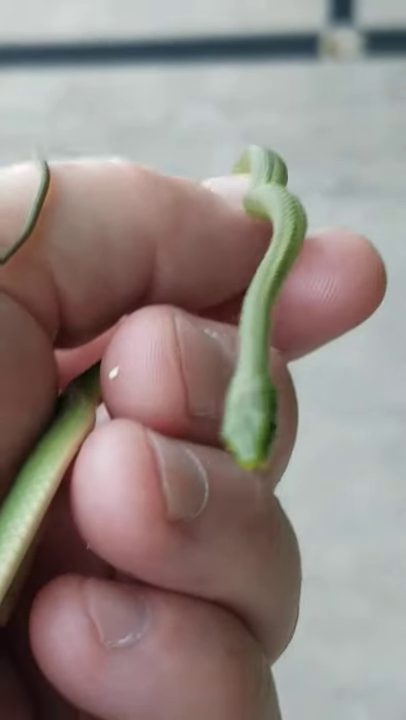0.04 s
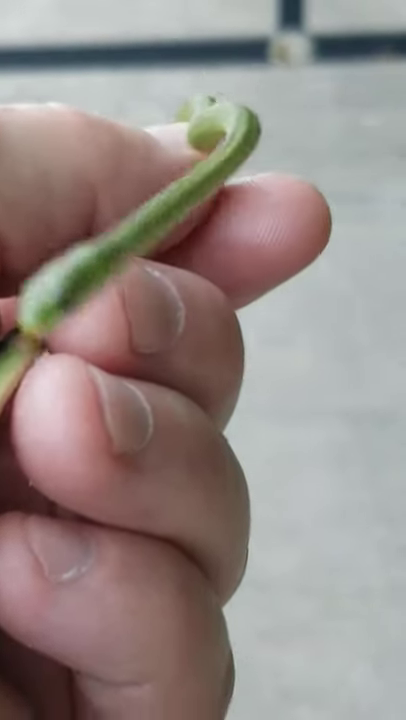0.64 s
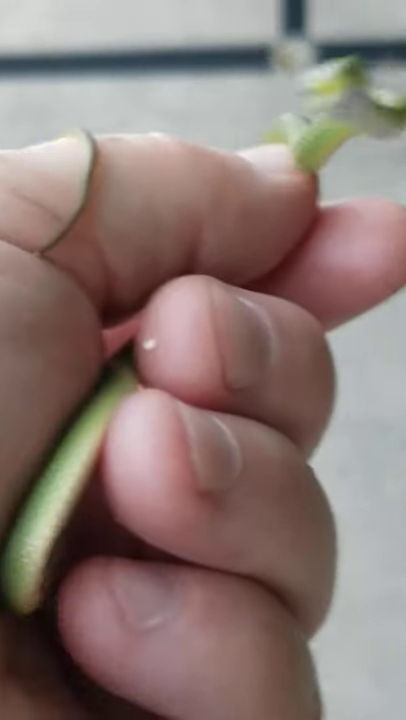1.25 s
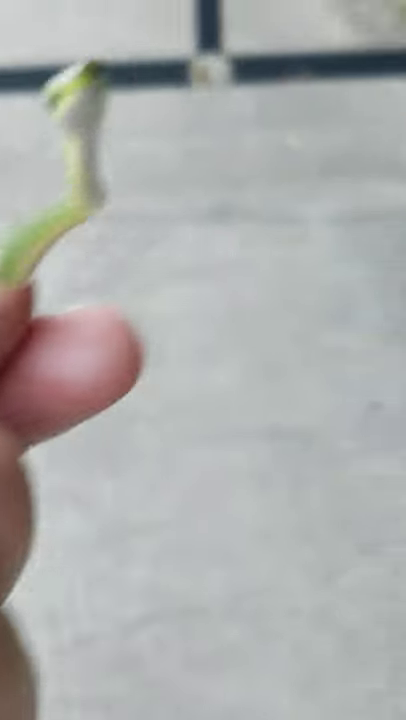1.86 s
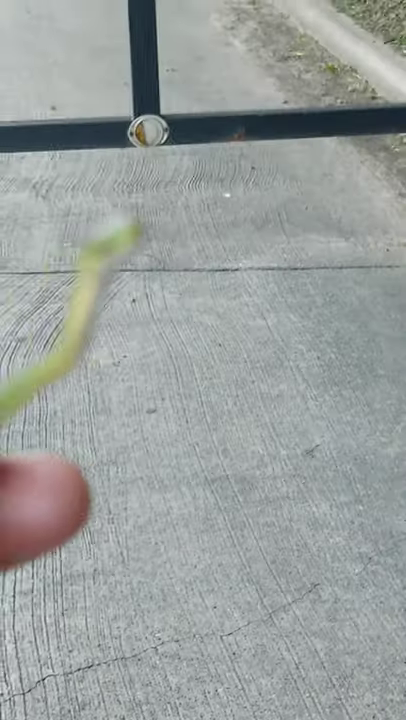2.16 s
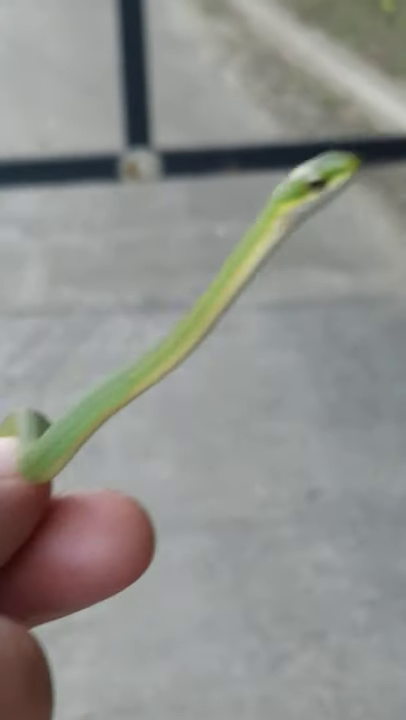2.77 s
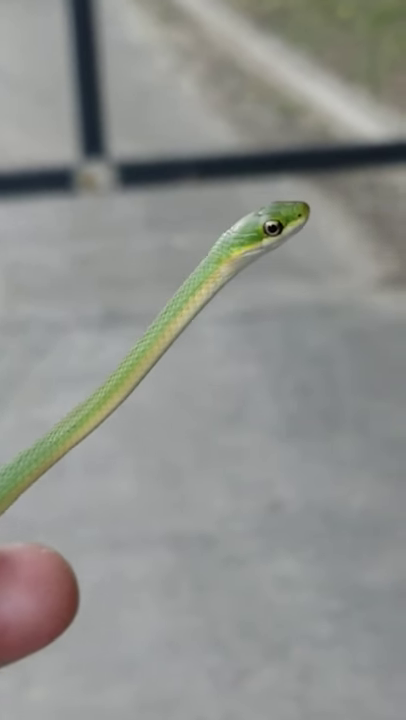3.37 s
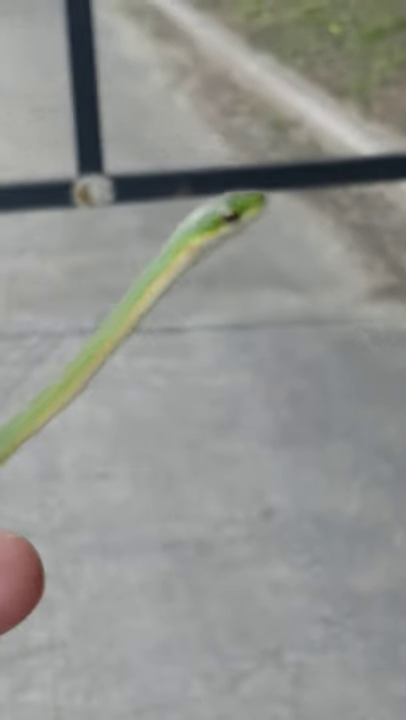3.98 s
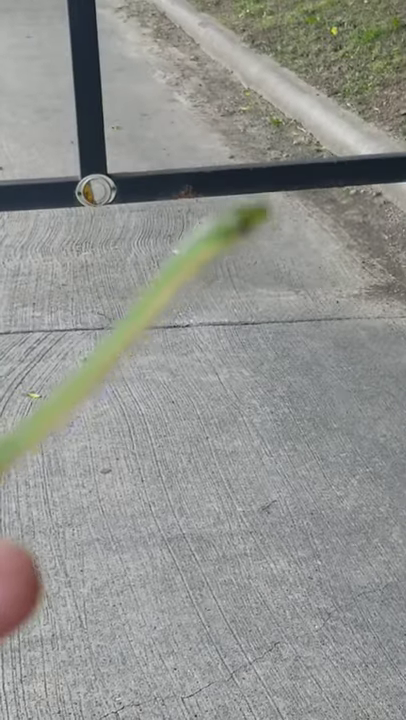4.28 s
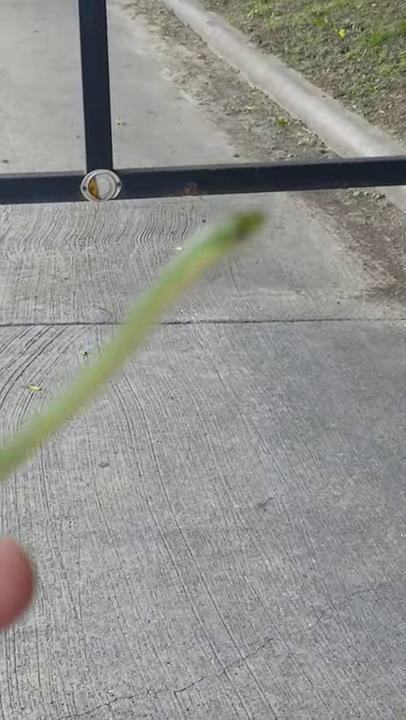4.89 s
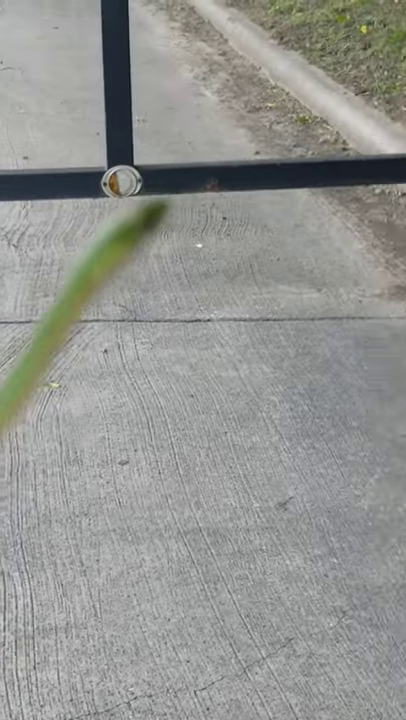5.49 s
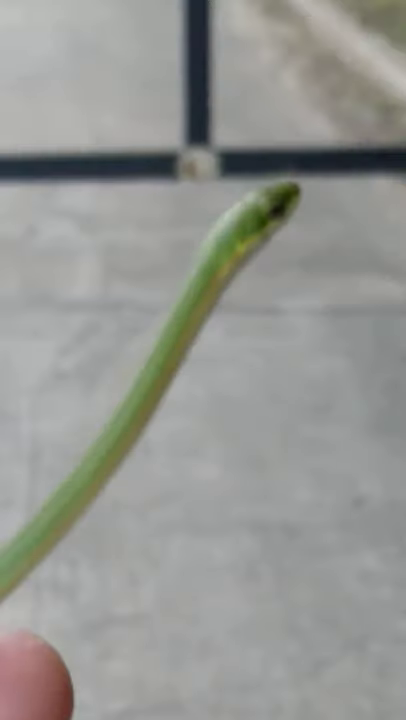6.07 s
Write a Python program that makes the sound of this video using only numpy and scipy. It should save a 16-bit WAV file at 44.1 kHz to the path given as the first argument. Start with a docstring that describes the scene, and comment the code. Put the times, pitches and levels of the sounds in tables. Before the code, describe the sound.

The sound opens quietly outdoors, with a steady hum of distant traffic and a light low wind on the microphone. At about 0.9 seconds the breeze picks up into an uneven, deep rumble, stronger on the left and dotted with soft thumps; it stays the loudest sound to the end. Behind it, the tyre noise of far cars gently swells and fades several times. A faint, high insect hiss sits on the right, slowly weakening, with a brief swell around 4.6 seconds. Very faint, raspy bird chirps come at about 0.7, 1.8 and between 3 and 4 seconds. At about 5.1 and 5.8 seconds a bird on the right gives two soft falling calls, each a rasp clearing into a whistle, the second louder. The wind thumps at about 4.8 seconds, then hardest around 5.7 and 6.1 seconds.

```python
"""Low wind rumble on a phone's two microphone ports, over the hum of far traffic and passing tyres.
Insects stridulate on the right, merging into a hiss. Single eddies thump the left port.
Birds chirp faintly; near the end one gives two falling calls, each a rasp clearing to a whistle."""
import sys
import numpy as np
from scipy import signal
from scipy.fft import rfft, irfft
from scipy.io import wavfile
from scipy.ndimage import uniform_filter1d

SR = 44100
rng = np.random.default_rng(int(sys.argv[2]) if len(sys.argv) > 2 else 0)


def to_wav(sig):
    """Store sig (one row per channel, or 1-D mono) as 16-bit WAV at the path in sys.argv[1].

    Samples outside -1..1 are clipped; the rate is SR.
    """
    pcm = np.clip(np.atleast_2d(sig), -1, 1) * 32767
    pcm = np.round(pcm).astype(np.int16)
    wavfile.write(sys.argv[1], SR, pcm.T)  # frames by channels


N = 274743
TIME_S, FREQ_HZ = np.arange(N) / SR, np.arange(N // 2 + 1) * SR / N

# breeze strength at the left port: time_s, level_db
BREEZE = [(0, -51), (.55, -55), (.82, -49.5), (.89, -33), (1.2, -32), (1.45, -36.5), (1.85, -30.5),
          (2.5, -31.5), (2.7, -35.5), (3.45, -33.5), (4.15, -37), (4.75, -39), (4.83, -29), (4.95, -39),
          (5.4, -34.5), (5.68, -27), (6.07, -34.5), (6.2, -28)]
# turbulence spectrum: freq_hz, relative_db
WIND_SPECTRUM = [(15, -22), (40, -6), (75, 1), (130, -2.5), (175, -9), (250, -28.5), (350, -35.5),
                 (600, -59), (1200, -97)]
# far traffic spectrum: freq_hz, left_db_per_hz, right_db_per_hz
FAR_TRAFFIC = [(29.8, -92, -84.5), (88, -88, -79.5), (248, -75, -74.5), (329, -85.5, -82.5),
               (427, -87, -86), (627, -96.5, -91), (810, -91.5, -92), (1002, -86.5, -83),
               (1217, -98.5, -97), (1430, -107, -104), (2190, -117, -112), (3200, -122, -114),
               (3730, -130, -126)]
# tyre spectrum before pass gains: freq_hz, left_db_per_hz, right_db_per_hz
TYRE_SPECTRUM = [(200, -81.5, -80), (398, -89, -83.5), (595, -92.5, -84.5), (785, -84.5, -81),
                 (1010, -87, -86), (1277, -91, -89), (1503, -99.5, -93.5), (1673, -105, -93.5),
                 (2016, -114, -103), (2500, -121, -113), (4000, -135, -130)]
# road sound between the ports: freq_hz, coherence, left_lead_rad
ROAD_IMAGE = [(100, 0.57, -1.5), (290, 0.99, 0.15), (467, 0.92, -1.2), (620, 0.7, 1.14), (830, 0.41, 1.5),
              (1050, 0.56, 1.13), (1430, 0.16, 1.0), (1880, 0.24, 2), (3000, 0.4, 10)]
# passing cars: nearest_s, gain_db, hiss_lift_db
CAR_PASSES = [(1.35, -.5, -3), (2.15, -7, 6.5), (3.35, 0.5, 4.5), (4.5, -1.5, -1.5), (5.7, -2.5, -3)]
# insect chorus spectrum before its gains: freq_hz, level_db_per_hz
INSECT_SPECTRUM = [(4200, -130), (4900, -110), (5750, -105.5), (6300, -110), (7200, -127), (8400, -121),
                   (9500, -119), (12000, -132)]
# chorus swells: peak_s, rise_db
INSECT_SWELLS = [(.42, 1.5), (1.88, 2), (4.57, 7)]
# vortices at the left port: nearest_s, level_db, pitch_hz
EDDIES = [(0.674, -29, 78), (0.865, -26.5, 97), (1.117, -18.5, 149), (1.218, -18.5, 112), (1.689, -19, 108),
          (1.813, -17.5, 113), (2.014, -24, 109), (2.237, -18, 81.5), (2.342, -17, 109), (2.48, -22, 91),
          (2.782, -19, 102), (3.163, -16, 97), (3.388, -20, 112), (3.876, -20.5, 82.5), (4.516, -19, 85),
          (4.846, -14, 97), (5.672, -8, 157), (5.742, -14, 95), (5.966, -16.5, 115), (6.15, -8.5, 143),
          (6.201, -16.5, 117)]
# faint bird chirps: start_s, length_s, pitch_hz, level_db, rasp_share
CHIRPS = [(0.704, 0.162, 3110, -80, .6), (1.697, 0.28, 5020, -80, 0.77), (1.799, .38, 2374, -76, 1),
          (3.196, 0.057, 3180, -77, .55), (3.741, 0.061, 3170, -85, 0.5), (3.933, 0.022, 3000, -74, 0.93),
          (5.698, .15, 4470, -84, .2)]
# contour of one bird call: age_s, pitch_hz, relative_db, rasp_share
CALL_SHAPE = [(0, 2815, -7, 0.46), (.03, 2936, -1.5, 0.7), (.06, 2465, -3, 0.96), (0.114, 2330, -17, 0.47),
              (.155, 2167, 0.5, .15), (.21, 1988, 1, 0.2), (0.243, 1880, -11, .35), (0.349, 1670, -5, .4)]
# bird calls: start_s, level_db
CALLS = [(5.051, -69), (5.775, -61.5)]
# microphone self-noise: freq_hz, left_db_per_hz, right_db_per_hz
MIC_HISS = [(1000, -114, -115), (4000, -115, -115), (6000, -118, -118), (8500, -119, -119),
            (9800, -115, -118), (12000, -115.5, -117.5), (14200, -112, -117), (14900, -107, -117),
            (15700, -105, -117)]


def undb(db):
    """Decibels to gain."""
    return 10 ** (np.asarray(db) / 20)


def spectra(rows):
    """Columns of a frequency table, interpolated on a log axis."""
    hz, *columns = np.transpose(rows)
    return np.array([np.interp(np.log(FREQ_HZ + 1), np.log(hz), c) for c in columns])


def white():
    """Spectra of two independent noises, 0 dB per Hz."""
    return rfft(rng.standard_normal((2, N))) * np.sqrt(SR / 2)


def shaped_noise(rows):
    """Two independent noises shaped by a dB table."""
    return irfft(white() * undb(spectra(rows)), N)


def unit_rms(x):
    """Each channel scaled to rms 1."""
    return x / np.sqrt(np.mean(x ** 2, axis=-1, keepdims=True))


def wander(rate_hz):
    """Random steps, smoothed twice; rms 1."""
    hold = int(SR / rate_hz)
    steps = np.repeat(rng.standard_normal(N // hold + 2), hold)
    return unit_rms(uniform_filter1d(uniform_filter1d(steps, hold), hold)[:N])


def high_pass(x, edge_hz, order):
    """Zero-phase high-pass, -6 dB at the edge."""
    return irfft(rfft(x) * FREQ_HZ ** order / (FREQ_HZ ** order + edge_hz ** order), N)


def wind(gust_hz=7, churn_hz=38, churn_db=3, typical_db=-40, shelter_db=-5.5, gain_db=-1):
    """One breeze, separate turbulence per port; stronger flow holds more small, higher-pitched eddies."""
    left_db = np.interp(TIME_S, *np.transpose(BREEZE))
    right_db = typical_db + shelter_db + 0.75 * (left_db - typical_db)  # sheltered: follows in part
    flow_db = np.array([left_db + 2.05 * wander(gust_hz), right_db + 3 * wander(gust_hz)])
    flow_db += churn_db * np.array([wander(churn_hz), wander(churn_hz)])
    swirl = unit_rms(shaped_noise(WIND_SPECTRUM))
    swirl /= np.sqrt(uniform_filter1d(swirl ** 2, size=SR // 8, axis=1))  # flow alone sets the level
    small_eddies = high_pass(swirl, edge_hz=190, order=4)
    brighten_db = 0.41 * (flow_db - typical_db)
    return undb(flow_db + gain_db) * (swirl - small_eddies + small_eddies * undb(brighten_db))


def road_noise(spectrum):
    """Part one wave reaching the ports out of phase, part diffuse."""
    coherence, lead_rad = spectra(ROAD_IMAGE)
    direct, diffuse = white()
    right = coherence * np.exp(-1j * lead_rad) * direct + np.sqrt(1 - coherence ** 2) * diffuse
    return irfft(np.array([direct, right]) * undb(spectra(spectrum)), N)


def far_traffic(waver_db=1, waver_hz=5.45):
    """Steady distant hum, wavering in moving air."""
    return road_noise(FAR_TRAFFIC) * undb(waver_db * wander(waver_hz))


def passing_cars(approach_s=0.38, recede_s=0.78, waver_db=1, waver_hz=12):
    """Tyre roar and hiss swell and fade with distance, wavering in moving air."""
    roar_power, hiss_power = 0, 0
    for nearest_s, gain_db, hiss_lift_db in CAR_PASSES:
        half_power_s = np.where(TIME_S < nearest_s, approach_s, recede_s)
        along_road = (TIME_S - nearest_s) / half_power_s
        power = undb(gain_db) ** 2 / (1 + along_road ** 2)
        roar_power += power
        hiss_power += power * undb(hiss_lift_db) ** 2
    tyres = road_noise(TYRE_SPECTRUM)
    hiss = high_pass(tyres, edge_hz=1500, order=8)
    cars = (tyres - hiss) * np.sqrt(roar_power) + hiss * np.sqrt(hiss_power)
    return cars * undb(waver_db * wander(waver_hz))


def insects(start_db=1.5, fall_db_per_s=0.78, swell_s=0.14, flutter_hz=55, flutter_db=1.03, left_db=-17):
    """Many stridulations merge into a fluttering hiss on the right; it swells at times and dies down."""
    chorus = shaped_noise(INSECT_SPECTRUM)
    swells_db = sum(db * np.exp(-((TIME_S - peak_s) / swell_s) ** 2) for peak_s, db in INSECT_SWELLS)
    gain_db = start_db - fall_db_per_s * TIME_S + swells_db + flutter_db * wander(flutter_hz)
    return chorus * undb(gain_db) * undb([[left_db], [0]])


def eddies(port_hz=850, reach_s=0.06):
    """A passing vortex swings the left port's pressure once or twice; a smaller one swings it faster."""
    pressure = np.zeros(N)
    for nearest_s, level_db, pitch_hz in EDDIES:
        near = np.abs(TIME_S - nearest_s) < reach_s
        passage = np.pi / 2 * pitch_hz * (TIME_S[near] - nearest_s)
        swing = np.exp(2j * np.pi * rng.random()) / (1 - 1j * passage) ** 5  # steep fall on both sides
        pressure[near] += undb(level_db) * swing.real
    left = irfft(rfft(pressure) / np.sqrt(1 + (FREQ_HZ / port_hz) ** 4), N)
    return np.array([left, np.zeros(N)])


def whistle(pitch_hz, rasp_share, tremor_depth=0.11, tremor_hz=1100):
    """Bird tone; a fast pitch tremor makes it rasp."""
    tremor = rasp_share * tremor_depth * wander(tremor_hz)
    return np.sin(2 * np.pi * np.cumsum(pitch_hz * (1 + tremor)) / SR)


def chirps(rise_share=0.04):
    """Short rasping notes that climb slightly."""
    song = np.zeros(N)
    for start_s, length_s, pitch_hz, level_db, rasp_share in CHIRPS:
        progress = np.clip((TIME_S - start_s) / length_s, 0, 1)
        envelope = np.sqrt(2 * np.abs(np.sin(np.pi * progress)))
        glide_hz = pitch_hz * (1 + rise_share * (progress - 0.5))
        song += undb(level_db) * envelope * whistle(glide_hz, rasp_share)
    return song


def calls(edge_s=0.015):
    """A rasp clearing to a falling whistle; given twice, the second louder."""
    knots_s, *columns = np.transpose(CALL_SHAPE)
    song = np.zeros(N)
    for start_s, level_db in CALLS:
        age_s = TIME_S - start_s
        pitch_hz, shape_db, rasp_share = (np.interp(age_s, knots_s, c) for c in columns)
        gate = np.clip(np.minimum(age_s, knots_s[-1] - age_s) / edge_s, 0, 1)
        song += gate * undb(level_db + shape_db) * whistle(pitch_hz, rasp_share)
    return song


def birds(t60_s=0.4, echo_db=-0.5, direct_db=-3, right_bias_db=6, port_lag_samples=6):
    """Chirps and calls from the right, scattered by trees and house fronts."""
    song = calls() + chirps()
    decay = np.exp(-np.log(1000) * TIME_S[:SR] / t60_s)
    tail = unit_rms(rng.standard_normal((2, SR)) * decay) / np.sqrt(SR)
    echoes = signal.fftconvolve(song[None], tail, axes=1)[:, :N]
    direct = np.array([song, np.roll(song, port_lag_samples)])
    pan = undb([[-right_bias_db / 2], [right_bias_db / 2]])
    return pan * (undb(direct_db) * direct + undb(echo_db) * echoes)


def scene():
    """Wind on the ports over road, insects and birds."""
    return wind() + far_traffic() + passing_cars() + insects() + eddies() + birds()


def record(dry, fade_s=0.004, top_hz=15780):
    """The microphones add hiss; the phone cuts the top."""
    hiss = shaped_noise(MIC_HISS)
    fade = np.clip(np.minimum(TIME_S, TIME_S[-1] - TIME_S) / fade_s, 0, 1)
    low_pass = 1 / (1 + (FREQ_HZ / top_hz) ** 400)
    return irfft(rfft((dry + hiss) * fade) * low_pass, N)


dry = scene()
out = record(dry)
to_wav(out)
```